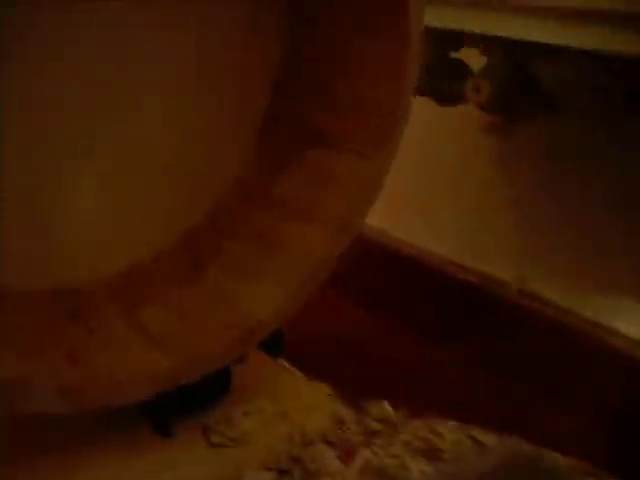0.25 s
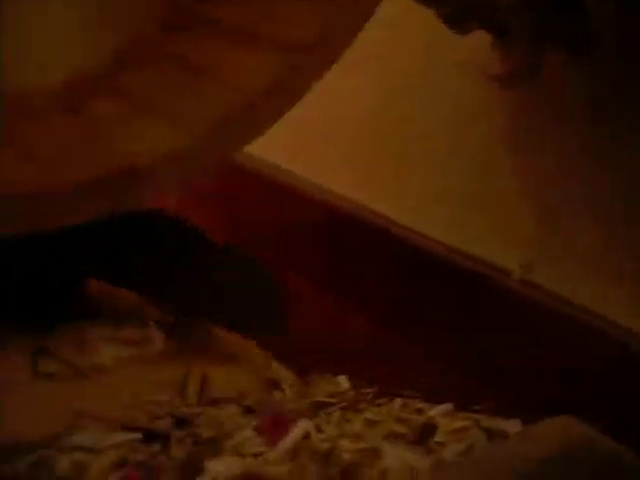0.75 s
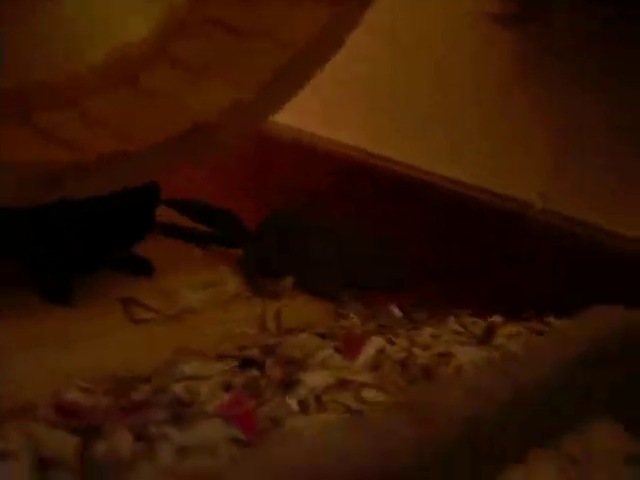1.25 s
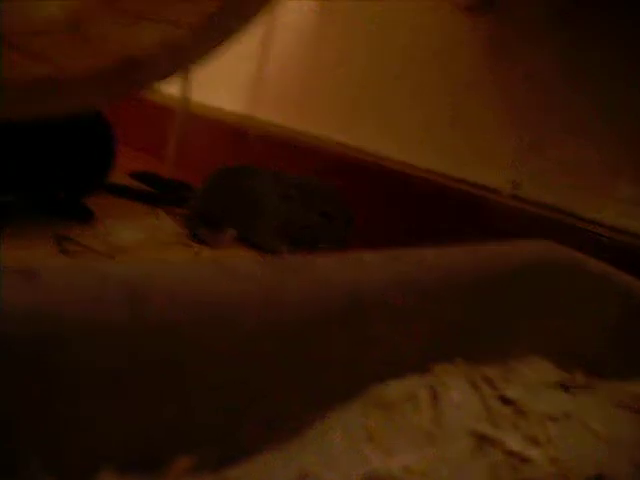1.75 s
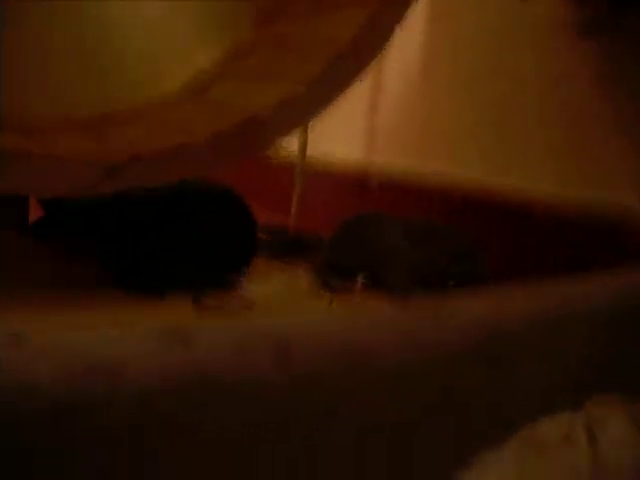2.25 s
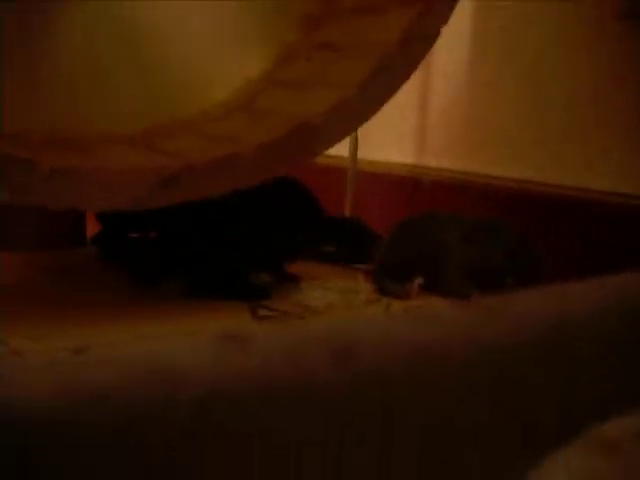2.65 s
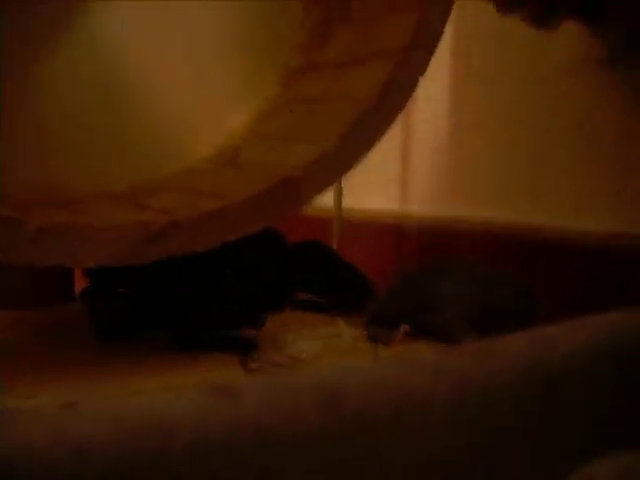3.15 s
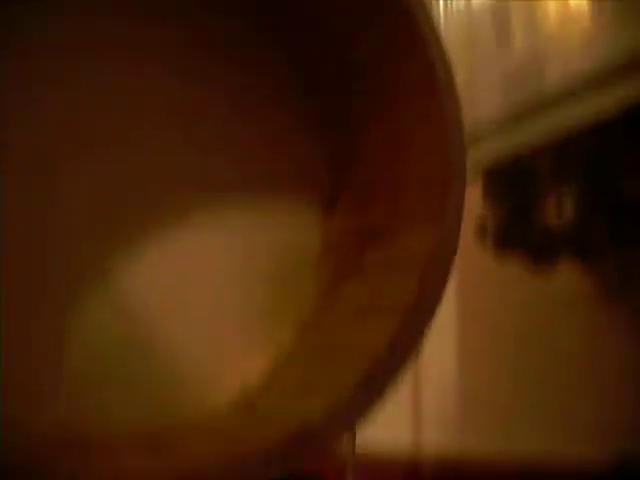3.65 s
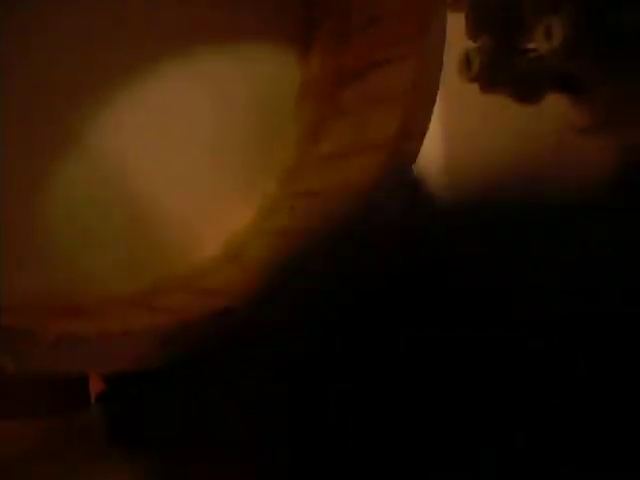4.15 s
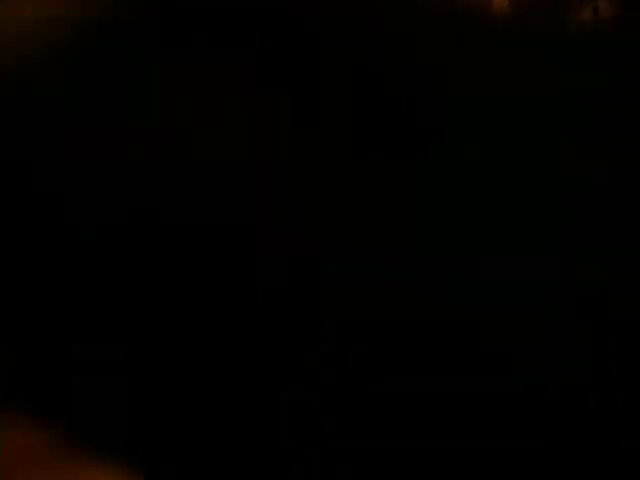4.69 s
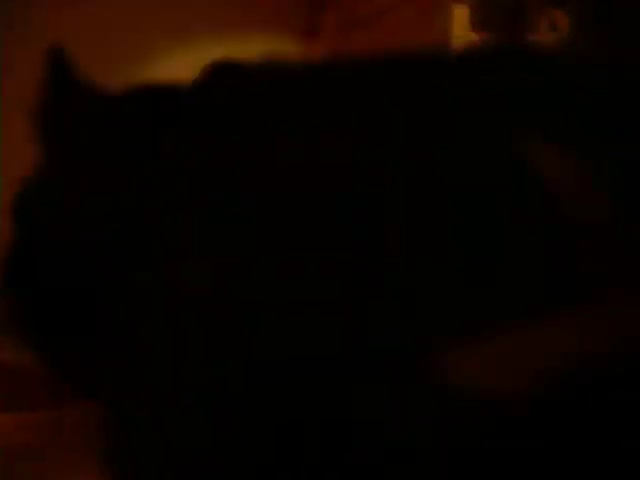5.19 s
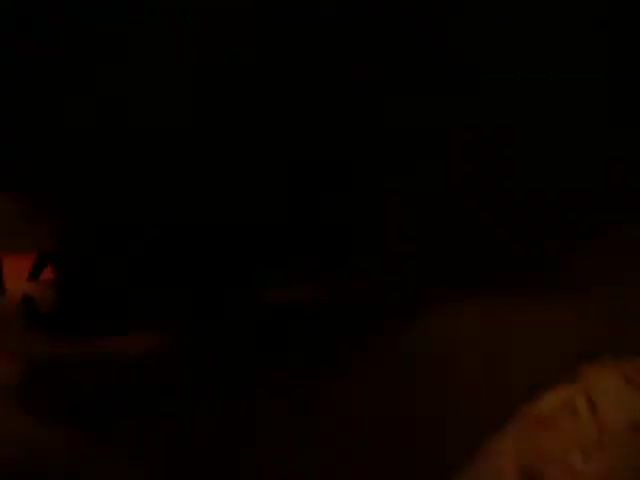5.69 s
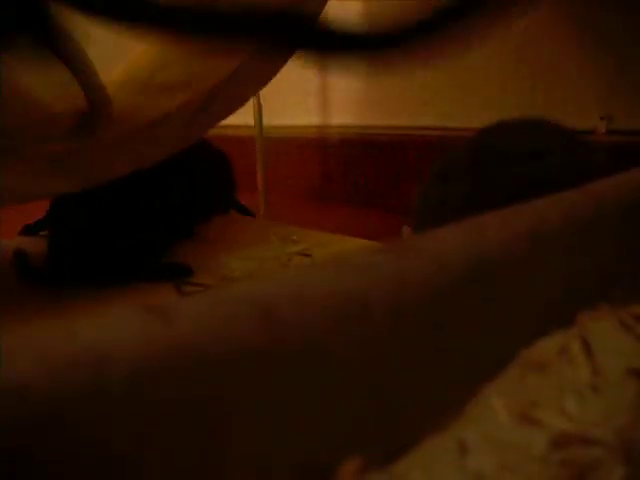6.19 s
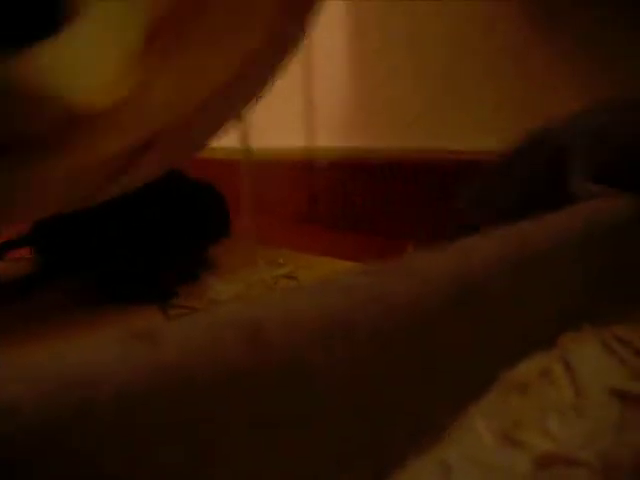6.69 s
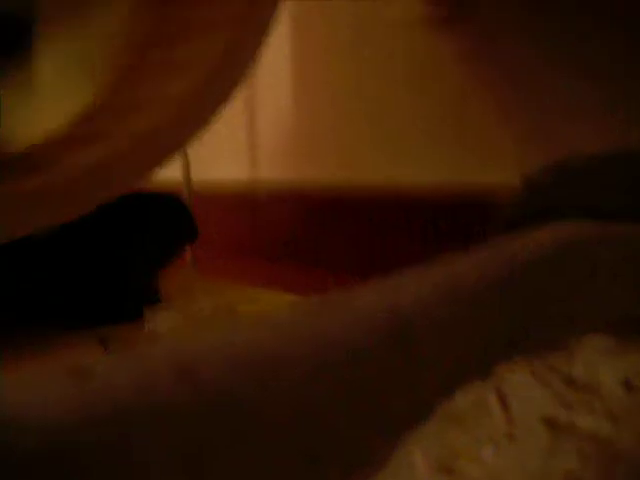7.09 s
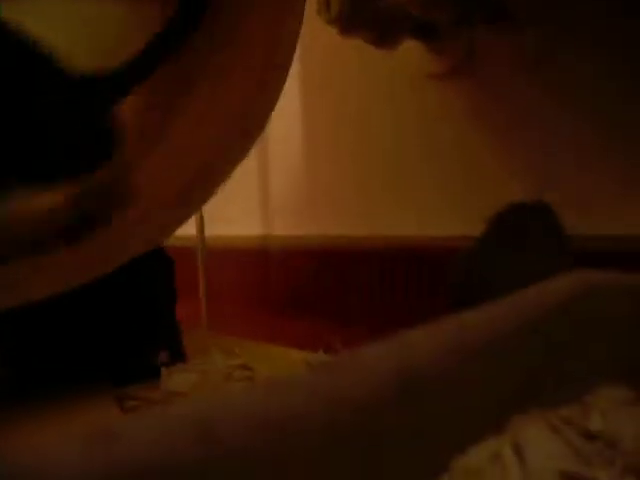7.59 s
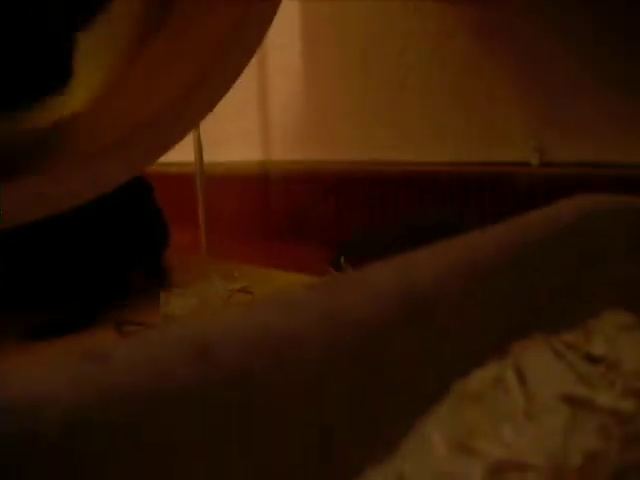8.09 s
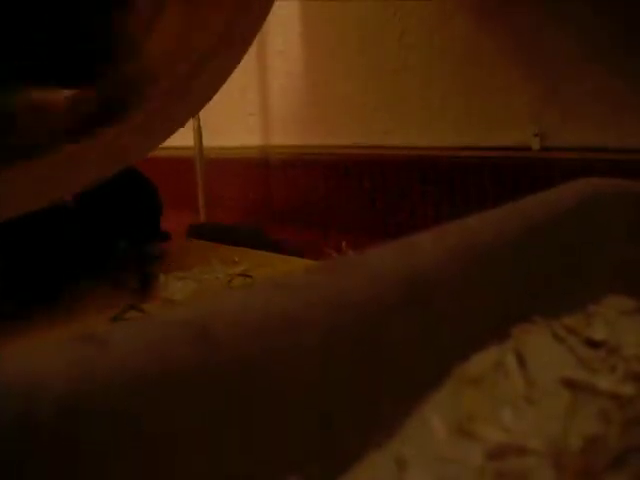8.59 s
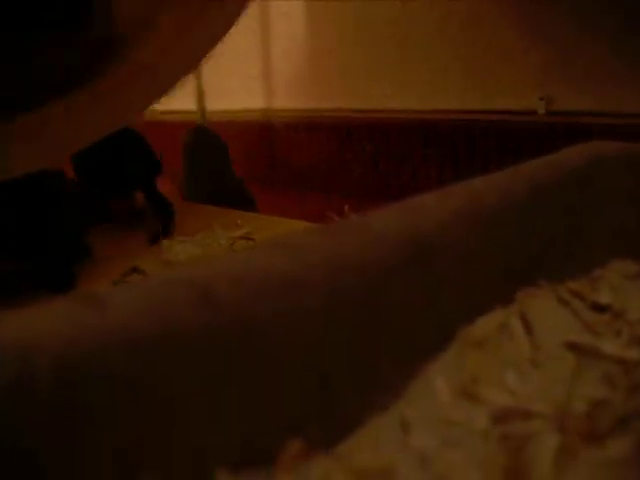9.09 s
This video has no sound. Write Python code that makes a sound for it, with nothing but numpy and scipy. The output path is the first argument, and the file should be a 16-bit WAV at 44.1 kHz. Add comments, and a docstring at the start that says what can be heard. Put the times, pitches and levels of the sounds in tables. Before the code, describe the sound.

Very close, boxy microphone handling in bedding: irregular gritty snaps, crunches and dry rustling, the loudest overloading. Quiet hiss and a soft cage thud open, then crackling comes in uneven clusters with short lulls. A tiny wavering tone slips by midway. Later a wooden exercise wheel hums and rattles with about ten ticks a second, followed by a last burst of harsh scraping.

```python
"""Shavings, paws and fingers crack and scrape against the plastic shell of a small camera in a rodent cage.
Cracks are gritty noise bursts filtered by shell resonances; the loudest overload the input.
Bedding rustles as dense clicks through the same shell; a wooden wheel rumbles as resonant noise and ticks.
Behind them lie dull cage knocks of decaying sines, a faint wavering tone and steady noise hiss."""
import sys
import numpy as np
from scipy import signal
from scipy.fft import rfft, irfft, next_fast_len
from scipy.io import wavfile
from scipy.ndimage import uniform_filter1d

SR = 44100
rng = np.random.default_rng(int(sys.argv[2]) if len(sys.argv) > 2 else 0)


def decibels_to_gain(level_db):
    """Convert a level in decibels to a linear amplitude gain (20 dB per decade)."""
    exponent = np.asarray(level_db, float) / 20
    return 10 ** exponent


def unload_audio(sound):
    """Save the sound as a 16-bit wav file, at the path given as the first command line argument."""
    columns = np.transpose(np.atleast_2d(sound))
    # keep every value between -1 and 1, then stretch to whole-number steps
    steps = np.round(np.clip(columns, -1, 1) * 32767)
    wavfile.write(sys.argv[1], SR, steps.astype(np.int16))


N = 411894
T = np.arange(N) / SR


def level(x, db):
    """Root-mean-square scaling: set the rms level in dB."""
    return x * decibels_to_gain(db) / np.sqrt(np.mean(x ** 2))


def curve(rows, axis=1):
    """Linear interpolation in time of one column of a table."""
    return np.interp(T, np.array(rows)[:, 0], np.array(rows)[:, axis])


def walk(rate):
    """Low-pass random fluctuation: levels held 1 / rate seconds, then smoothed twice."""
    hold = int(SR / rate)
    steps = np.repeat(rng.standard_normal(N // hold + 1), hold)
    return uniform_filter1d(uniform_filter1d(steps, hold), hold)[:N]


def add(out, s, x):
    """Superposition: mix x in at time s."""
    i = int(s * SR)
    out[i:i + len(x)] += x[:N - i]


def ring(x, modes, db):
    """Modal resonance: parallel resonators (Hz, width in Hz) of gain db with alternating signs."""
    size = next_fast_len(len(x) + 4096)
    f = np.arange(size // 2 + 1) * SR / size + 0.00054  # the offset avoids division by zero
    response = 0
    for k, (mode, gain_db) in enumerate(zip(modes, db)):
        detuning = (f - mode[0] ** 2 / f) / mode[1]
        response = response + (-1) ** k * decibels_to_gain(gain_db) / (1 + 1j * detuning)
    return irfft(rfft(x, size) * response, size)[:len(x)]


# Spectrum of the self-noise. Each row: frequency in Hz, relative density in dB per Hz.
HISS = [(20, -3.5), (60, -1.5), (130, -4.5), (300, -9.5), (800, -11), (3000, -17.5), (7000, -19.5),
        (9000, -26)]
HISS_DB = -44.5  # rms of the whole hiss


def hiss():
    """Stationary self-noise of microphone and amplifier: white noise shaped by a fixed spectrum."""
    hz, db = np.transpose(HISS)
    f = np.arange(N // 2 + 1) * SR / N + 1
    shape = decibels_to_gain(np.interp(np.log(f), np.log(hz), db))
    return level(irfft(rfft(rng.standard_normal(N)) * shape, N), HISS_DB)


# Faint wavering tones, one table each. Each row: time in seconds, pitch in Hz, fundamental amplitude in dB.
WHINES = [
    [(4.9, 298.6, -48), (4.95, 343, -46), (5.06, 329, -44), (5.145, 338, -38)],
]


def whine(rows):
    """Frequency modulation: a slightly unsteady tone whose octave partial weakens as the pitch rises."""
    hz = curve(rows)
    octave_db = -6 - 9 * np.log2(hz / 330)
    phase = 2 * np.pi * np.cumsum(hz * (1 + 0.0047 * walk(32))) / SR
    fade_in = np.clip((T - rows[0][0]) / 0.0083, 0, 1)
    fade_out = np.clip((rows[-1][0] - T) / 0.011, 0, 1)
    tone = np.sin(phase) + decibels_to_gain(octave_db) * np.sin(2 * phase)
    return fade_in * fade_out * decibels_to_gain(curve(rows, axis=2)) * tone


# Low modes of the cage. Each row: frequency in Hz, relative amplitude in dB, 60 dB decay time in seconds.
CAGE = [(66.4, 1.5, 0.89), (130, 10.5, 0.042), (219, -0.5, 0.24)]
# Dull knocks on the cage. Each row: start in seconds, gain in dB.
KNOCKS = [(0.401, -36), (0.48, -43)]


def knocks():
    """Free decay: a soft blow leaves the low modes of the cage ringing as damped sines."""
    out, t = np.zeros(N), T[:SR // 2]
    blow = np.zeros(len(t))
    for hz, db, t60 in CAGE:
        blow -= decibels_to_gain(db) * np.sin(2 * np.pi * hz * t) * np.exp(-np.log(1000) * t / t60)
    for s, db in KNOCKS:
        add(out, s, decibels_to_gain(db) * blow)
    return out


# Steady ticking of the wheel. Each row: first tick in seconds, number of ticks, period in seconds, level in dB.
SPINS = [(7.210, 8, .1, -32), (8.096, 6, .1, -29)]
# Weaker stray ticks between and just after the steady ones. Each row: start in seconds, level in dB.
TICKS = [(7.368, -33.5), (7.845, -38), (8.344, -37.5), (8.551, -39), (8.643, -36)]
TICK_JITTER_S, TICK_SCATTER_DB = 0.0013, 0.5  # standard deviations for the steady ticks


def ticks():
    """Quasi-periodic excitation: time and level of each tick, the steady ones a little uneven."""
    steady = np.array([(s + k * period, db) for s, count, period, db in SPINS for k in range(count)])
    uneven = steady + rng.standard_normal(steady.shape) * [TICK_JITTER_S, TICK_SCATTER_DB]
    return [*uneven, *TICKS]


# The turning wooden wheel. Each row: time in seconds, then levels in dB of the low hum,
# the middle modes and the rasp of the high modes.
WHEEL = [(0, -85, -72, -70), (.38, -47, -53, -75), (.95, -58.5, -53, -75), (1.05, -66, -75, -84.5),
         (6.7, -77, -71, -69), (6.85, -39, -67, -64), (7.1, -45, -46, -49), (7.9, -46, -46, -51),
         (8.05, -50, -46, -50), (8.3, -43.5, -48.5, -53.5), (8.65, -49, -50, -55), (8.95, -76, -55.5, -79)]
# Resonances of the wheel. Each row: frequency in Hz, width in Hz, relative gain in dB before a spectral tilt.
WHEEL_MODES = [(140, 17, -1.5), (174, 31, -6), (265, 117, -7), (580, 45, 0.5), (1130, 160, 1),
               (2835, 280, 1), (4100, 150, -10), (4700, 160, -7.5), (5580, 220, -9.5), (6730, 180, -4.5)]
# Edges between the low, middle and high groups of modes, in Hz.
WHEEL_GROUPS_HZ = [0, 400, 1900, 9000]


def wheel():
    """Forced resonance: bearing noise hums, rings and rasps in three mode groups; ticks are short rattles."""
    modes = np.array(WHEEL_MODES)
    hz, _, db = modes.T
    out, t = np.zeros(N), T[:4096]
    for column in (1, 2, 3):
        keep = (hz > WHEEL_GROUPS_HZ[column - 1]) & (hz < WHEEL_GROUPS_HZ[column])
        bearing = rng.standard_normal(N) * decibels_to_gain(2.5 * walk(18))
        rung = ring(bearing, modes[keep], (db - 2.5 * np.log2(hz / 500))[keep])
        out += level(rung, 0) * decibels_to_gain(curve(WHEEL, axis=column))
    for s, tick_db in ticks():
        grit = rng.standard_normal(len(t)) * decibels_to_gain(4 * rng.standard_normal(len(t)))
        rattle = grit * np.clip(t / .004, 0, 1) * np.exp(-(t / .019) ** 2)
        # each tick has its own colour: modes shift in pitch and gain
        shift = .012 * rng.standard_normal(len(hz))
        colour_db = 2.5 * rng.standard_normal(len(hz))
        rung = ring(rattle, modes * (1 + shift[:, None]), db + colour_db + np.log2(hz / 500))
        # the rms over the 93 ms window lies 13 dB under the tick's tabled level
        add(out, s, level(level(rung, 0) + level(rattle, -9), tick_db - 13))
    return out


PORT_HZ = 6000  # modes above this belong to the microphone port


def nearness_db(hz, centre_hz, octaves):
    """Modal coupling: modes far from the contact's centre ring less, faster so above it; the port is exempt."""
    away = np.log2(hz / centre_hz) / octaves
    loss_db = -6 * away ** 2 - 1.65 * np.maximum(away, 0) ** 2
    return np.maximum(loss_db, -24) * (hz < PORT_HZ)


def focus(db):
    """Contact stiffness: harder contact couples to one spot and rings fewer modes (spread in octaves)."""
    return np.interp(db, [-35, -10, -2], [.7, .32, .2])


# Resonances of the plastic shell. Each row: frequency in Hz, width in Hz, relative gain in dB.
SHELL = [(109, 96, 7), (350, 620, 11), (505, 225, 12.5), (578.4, 204, 10.5), (821, 424, 2.5),
         (995, 134, 4.5), (1250, 150, -0.5), (1682, 273, 2), (2167, 210, 5.5), (2700, 490, 2),
         (2992, 490, 2.5), (3500, 480, 0), (4110, 630, -1), (4670, 650, -2.5), (5190, 360, -1),
         (6965, 1060, -13)]
LOW_UNDER_HZ, HIGH_OVER_HZ = 1900, 1500  # the groups overlap: one mode belongs to both


def in_group(high):
    """Modal grouping: mark either the high or the low modes of the shell."""
    hz = np.array(SHELL)[:, 0]
    return hz > HIGH_OVER_HZ if high else hz < LOW_UNDER_HZ


def shell(x, centre_hz, octaves, high, spot_db=0):
    """Modal excitation: ring one group of shell modes, weighted by nearness to the contact."""
    hz, _, db = np.transpose(SHELL)
    keep = in_group(high)
    gain_db = db + spot_db + nearness_db(hz, centre_hz, octaves)
    return ring(x, np.array(SHELL)[keep], gain_db[keep])


# Overlapping scrapes and brushes in the bedding. Each row: start in seconds, length in seconds,
# level of the dull part in dB, level of the bright part in dB.
SCRAPES = [(1.394, 4.4, -55, -63), (1.54, 0.13, -15.5, -28), (1.652, 0.24, -39, -44),
           (1.853, 0.14, -41, -44.5), (1.992, 0.12, -42.5, -41.5), (1.78, 0.083, -19.5, -29.5),
           (2.266, 0.24, -45.5, -46), (2.547, 0.048, -29, -36.5), (2.588, 0.12, -38.5, -46),
           (2.638, 0.025, -23, -34), (2.777, 0.049, -34, -39.5), (2.833, 0.3, -47, -54.5),
           (3.051, 0.056, -50, -44), (3.374, 0.046, -11.5, -20), (3.414, 0.055, -33, -31.5),
           (3.596, 0.069, -46, -48), (3.728, 0.025, -54, -39), (3.917, 0.15, -43.5, -41.5),
           (3.961, 0.029, -25, -36), (4.031, 0.039, -39.5, -33.5), (4.21, 0.05, -40.5, -44.5),
           (4.259, 0.07, -44.5, -40), (4.352, 0.14, -37, -44), (4.513, 0.063, -29.5, -42),
           (4.567, 0.26, -44, -57), (5.016, 0.068, -39, -41), (5.104, 0.13, -37, -43.5),
           (5.296, 0.046, -35.5, -36), (5.35, 0.25, -45.5, -49), (5.527, 0.043, -32.5, -42),
           (5.719, 0.037, -30.5, -35), (6.524, 0.073, -45, -47), (6.582, .14, -23.5, -25),
           (6.731, 0.037, -25, -34), (6.647, 0.054, -10, -21.5), (6.744, 3.5, -56, -65),
           (6.792, 0.055, -37.5, -41.5), (6.91, 0.29, -42.5, -46), (7.026, 0.031, -23.5, -30),
           (7.907, 0.12, -40.5, -45.5), (9.044, 0.1204, -26.5, -23.5), (9.061, 0.072, -24, -19),
           (9.284, .1, -27, -31), (9.318, 0.17, -14, -28)]
# An edge lasts a fixed time plus a share of the length: hard scrapes are abrupt, light brushes swell.
EDGE_S, HARD_EDGE, LIGHT_EDGE = 0.0039, 0.05, 0.28


def scrape_db(axis):
    """Incoherent summation: the powers of all scrapes add over a faint floor; returns dB."""
    power = decibels_to_gain(-64.5) ** 2
    for row in SCRAPES:
        start, length, dull_db = row[:3]
        share = np.interp(dull_db, [-42, -30], [LIGHT_EDGE, HARD_EDGE])
        edge = EDGE_S + share * min(length, .15)
        inside = np.minimum(T - start, start + length - T)
        power = power + (decibels_to_gain(row[axis]) * np.clip(inside / edge + .5, 0, 1)) ** 2
    return 10 * np.log10(power)


def crumbs(count, scatter_db):
    """Shot noise: dense random clicks, a few much louder than the rest."""
    t, size, sign = rng.random((count, 3)).T
    clicks = np.sign(sign - .5) * decibels_to_gain(-scatter_db * np.log(1 - size))
    return np.bincount((t * N).astype(int), clicks, N)


def rub(grains, high, centre_hz, octaves, db):
    """Time-varying modal coupling: grains ring one group of shell modes around a moving centre."""
    rung = 0
    for k, mode in enumerate(np.array(SHELL)[in_group(high)]):
        coupling = (-1) ** k * decibels_to_gain(nearness_db(mode[0], centre_hz, octaves))
        rung = rung + coupling * ring(grains, [mode], [mode[2]])
    # a 41 ms running rms evens the level out before the scrapes shape it
    return rung / np.sqrt(uniform_filter1d(rung ** 2, size=1800)) * decibels_to_gain(db)


# The spot of contact wanders over the shell; the cracks' snaps follow it too. Each row: time in seconds,
# centre of the low modes in Hz, centre of the high modes in Hz.
TOUCH = [(1.5, 757, 2700), (1.7, 808, 2920), (2.1, 1020, 3500), (2.6, 874, 3300), (2.635, 890, 4320),
         (3.3, 990, 3670), (3.36, 1300, 5040), (3.42, 1350, 4700), (3.64, 1480, 5450), (3.75, 1090, 3520),
         (4.5, 1000, 3500), (4.558, 960, 4660), (4.62, 940, 4100), (5.14, 930, 2700), (5.2, 930, 3500),
         (5.75, 978, 2700), (7.534, 966, 2470), (7.64, 900, 3900), (9.0, 1030, 3160)]


def rustle():
    """Granular friction: shavings rub as dense crumbs heard through the shell, in overlapping scrapes."""
    dull_db, bright_db = scrape_db(axis=2), scrape_db(axis=3)
    # light rubbing is smooth, hard rubbing sticks and slips
    flicker = decibels_to_gain(np.interp(dull_db, [-40, -20], [2.5, 3.6]) * walk(400))
    dull_grains = crumbs(count=40000, scatter_db=2.4) * flicker
    bright_grains = crumbs(count=50000, scatter_db=2.5) * flicker
    bright_octaves = np.interp(bright_db, [-40, -25], [.55, .6])
    dull = rub(dull_grains, False, curve(TOUCH), focus(dull_db) + 0.27, dull_db)
    bright = rub(bright_grains, True, curve(TOUCH, axis=2), bright_octaves, bright_db)
    return dull + bright


# Cracks against the shell. Each row: start in seconds, contact time scale in ms, body level in dB,
# body centre in Hz, snap level in dB; levels are referred to the contact time.
CRACKS = [(0.28, 4.1, -64, 1780, -37), (1.533, 7.7, -6, 720, -12), (1.548, 2.9, -3, 740, -24),
          (1.5671, 3, -20, 880, -19), (1.5787, 3.8, -22, 1140, -16), (1.5882, 8.5, -11.5, 680, -19.5),
          (1.6025, 1.8, -5.5, 716, -13.5), (1.6098, 3, -13, 800, -28), (1.622, 4, -12.5, 740, -15),
          (1.6336, 6.8, -12.5, 750, -24), (1.648, 2.6, -9.5, 1108, -12.5), (1.6538, 2, -15.5, 880, -17.5),
          (1.657, 6.9, -4.5, 850, -13.5), (1.7235, 2, -34, 900, -34), (2.001, 19, -35, 141.4, -58),
          (2.5676, 10, -15.5, 870, -28.5), (2.5753, 7.4, -7.5, 830, -31), (2.6332, 0.67, -17, 720, -15),
          (2.6375, 6, -20.5, 1250, -12), (2.7884, 5.1, -20, 1250, -17), (2.8178, 8, -25, 900, -51),
          (3.272, 8.3, -29.5, 1220, -48), (3.312, 18, -30.5, 835, -48.5), (3.326, 3.8, -26, 930, -35.5),
          (3.365, 6, -20.5, 1160, -24), (3.3761, 3.5, -7.5, 1670, -5), (3.384, 7.5, -11, 1500, -15),
          (3.392, 2.9, -7, 1300, -15.5), (3.399, 7, -7.5, 1300, -16.5), (3.4072, 4.7, -6.5, 1150, -12.5),
          (3.413, 4.7, -3, 480, -24), (3.4641, 6.3, -25.5, 1090, -39), (3.606, 1.5, -42, 1490, -26),
          (3.627, 0.68, -20, 1720, -18.5), (3.644, 4.8, -30.5, 1260, -33), (3.9635, 3.2, -18, 720, -16),
          (3.966, 22, -21, 130, -45), (3.971, 7, -17, 1080, -13), (4.461, 7.5, -20.5, 990, -21.5),
          (4.495, 3, -26, 1500, -25.5), (4.511, 3.2, -27, 990, -30), (4.546, 6.6, -22.5, 716, -19.5),
          (4.5574, 5.7, -14, 1250, -11), (4.6063, 4.1, -6.5, 956, -20), (4.614, 1.9, -9.5, 1720, -14.5),
          (4.6198, 4, -15.5, 950, -17), (4.708, 2.7, -17.5, 1390, -15), (4.7278, 10.4, -28.5, 840, -40),
          (4.7685, 2.1, -15, 810, -23.5), (4.793, 1.7, -17.5, 780, -12.5), (4.957, 6.9, -32.5, 880, -56),
          (5.002, 8.1, -30, 890, -30), (5.111, 5.7, -32, 1110, -22), (5.14, 4.4, -37, 1250, -21.5),
          (5.1613, 14, -31, 1160, -26), (5.198, 4.8, -25, 1020, -16.5), (5.228, 5.9, -40, 770, -32),
          (5.351, 8.3, -31, 760, -34), (5.466, 2.9, -30, 930, -24), (5.4732, 9.1, -19.5, 1070, -30.5),
          (5.518, 5.4, -29.5, 1590, -30), (5.544, 7.6, -23.5, 1020, -28.5), (5.7129, 1.7, -20, 1110, -18.5),
          (5.7193, 0.78, -8.5, 1111, -7.5), (5.732, 2.4, -16.5, 940, -28), (5.805, 11, -42, 990, -39),
          (6.59, 3.2, -11, 1190, -8.5), (6.609, 6.1, -15.5, 1130, -16.5), (6.619, 2.3, -11, 1120, -13.5),
          (6.628, 3.1, -13.5, 1040, -16), (6.639, 6.4, -11.5, 1018, -21), (6.657, 6.8, -9.5, 953, -15.5),
          (6.665, 4.8, -9, 988, -13), (6.673, 7.7, -8.5, 995, -12), (6.681, 5, -15, 991, -13),
          (6.6886, 2.1, 5, 993, -19.5), (6.6939, 3.6, -10.5, 980, -10.5), (6.7, 3.1, -7.5, 997, -15.5),
          (6.7101, 4.6, -2.5, 1057, -12.5), (6.7337, 8.4, -8, 1030, -22), (6.744, 2.8, -15, 910, -19),
          (6.808, 10, -25, 1000, -28), (6.8198, 2.5, -12.5, 940, -28), (6.9361, 3.8, -15.5, 1035, -13.5),
          (6.942, 3.8, -12, 930, -23), (7.0331, 7.2, -50, 1080, -21), (7.119, 7.9, -26.5, 814, -40),
          (7.181, 4, -28, 810, -55), (7.441, 5.6, -29, 1090, -30.5), (7.5344, 1.62, -3.5, 1030, -1.5),
          (7.652, 0.29, -50, 900, -21), (7.6796, 7.3, -35, 860, -29), (9.0462, 6, -27.5, 604, -22.5),
          (9.0598, 2.1, -14.5, 1020, -14), (9.0645, 3.4, -19.5, 1000, -15), (9.0832, 2.6, -2, 1020, -9.5),
          (9.093, 2.5, -19.5, 1010, -7.5), (9.0959, 2.3, -16, 1050, -9.5), (9.1053, 2.3, -8.5, 1080, -14),
          (9.1116, 7.2, -12, 1155, -12.5), (9.1501, 9, -10, 1050, -10), (9.296, 2.8, -18, 935, -28),
          (9.3005, 1.4, -5.5, 1010, -25), (9.307, 5.5, -10.5, 1020, -14), (9.3141, 1.2, -8, 1020, -7.5),
          (9.318, 4.5, -12, 1080, -16), (9.326, 4.5, -12, 1000, -17), (9.334, 6, -15, 977, -15)]


def cracks():
    """Impact excitation: a short gritty contact of sharp first blow, uneven push and quick release."""
    out, t = np.zeros(N), T[:3072]
    snap_centre = curve(TOUCH, axis=2)
    for s, ms, body_db, body_hz, snap_db in CRACKS:
        contact_s = ms / 1000
        grit = rng.standard_normal((2, len(t))) * decibels_to_gain(2.9 * rng.standard_normal((2, len(t))))
        spot_db = 2.5 * rng.standard_normal(len(SHELL))  # each spot rings the modes differently
        rise = np.clip(t / (0.037 * contact_s), 0, 1)
        blow = 7 * (t == 0)
        push = grit[0] * rise * np.exp(-(t / (0.96 * contact_s)) ** 3)
        body = shell(blow + push, body_hz, focus(body_db), False, spot_db)
        # the snap begins to fall sooner than the body
        scratch = grit[1] * rise * np.exp(-(t / (0.61 * contact_s)) ** 1.3)
        snap = shell(scratch, snap_centre[int(s * SR)], 0.68, True, spot_db)
        # refer the rms over the whole window to the contact time
        spread_db = 10 * np.log10(contact_s * SR / len(t))
        add(out, s, level(body, body_db + spread_db) + level(snap, snap_db + spread_db))
    return out


def scene():
    """Superposition: the pressures of all sources add at one microphone."""
    background = hiss() + sum(map(whine, WHINES)) + knocks()
    return (background + wheel() + rustle() + cracks())[None]


def band_limit(x):
    """A steep low-pass at the top of the band."""
    return signal.sosfilt(signal.butter(12, 16820, fs=SR, output="sos"), x)


TOP_HZ, CLIP = 7380, .71  # soft top edge; overload amplitude


def record(dry):
    """Band limiting and clipping: a soft top edge, a steep cut above it, then hard overload."""
    soft = signal.sosfilt(signal.butter(10, TOP_HZ, fs=SR, output="sos"), dry)
    narrow = signal.sosfilt(signal.ellip(12, .5, 95, 8800, fs=SR, output="sos"), soft)
    mix = np.clip(narrow, -CLIP, CLIP)
    return band_limit(mix)


dry = scene()
out = record(dry)
unload_audio(out)
```